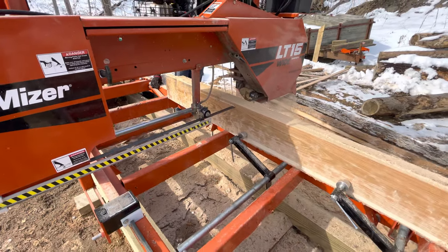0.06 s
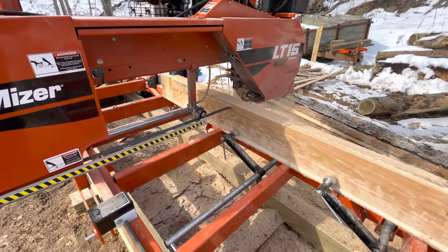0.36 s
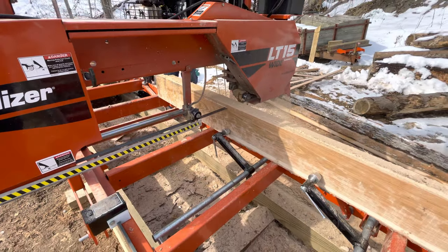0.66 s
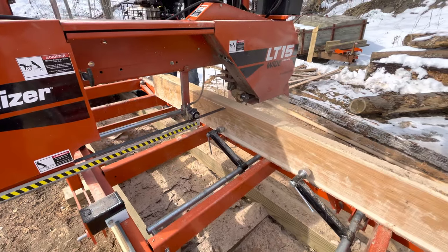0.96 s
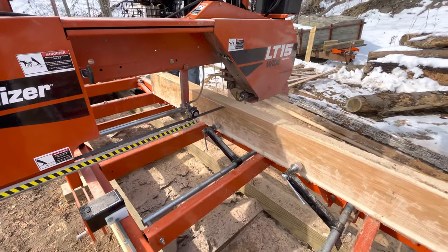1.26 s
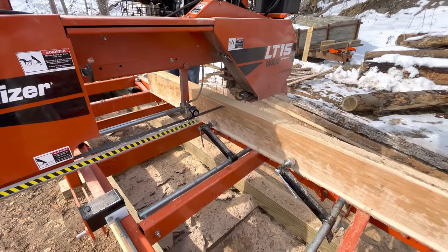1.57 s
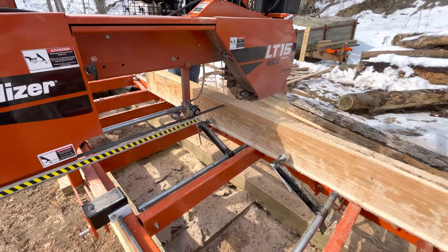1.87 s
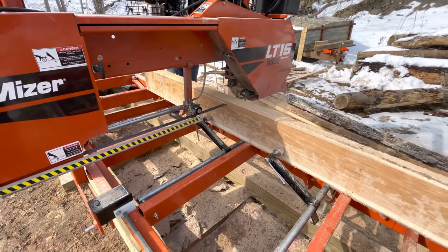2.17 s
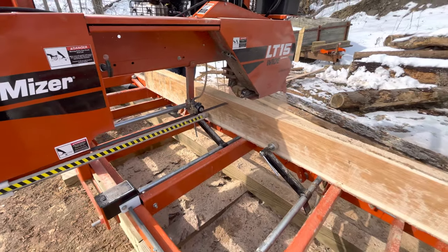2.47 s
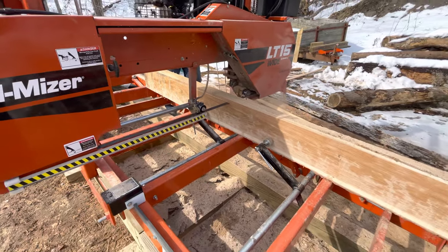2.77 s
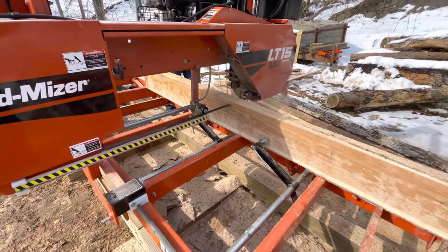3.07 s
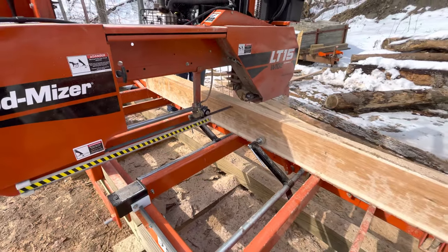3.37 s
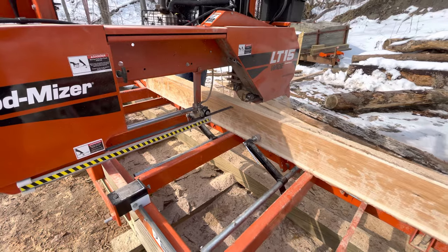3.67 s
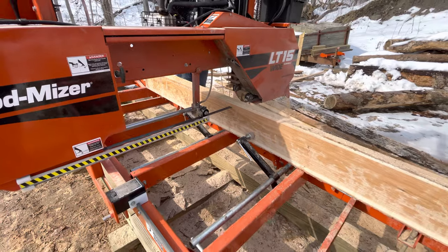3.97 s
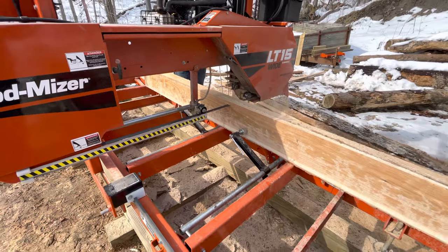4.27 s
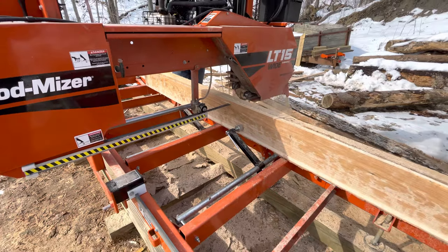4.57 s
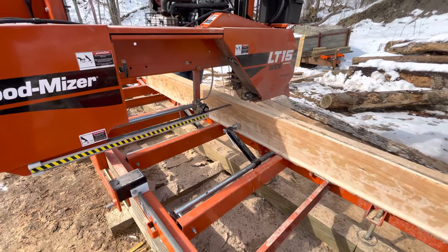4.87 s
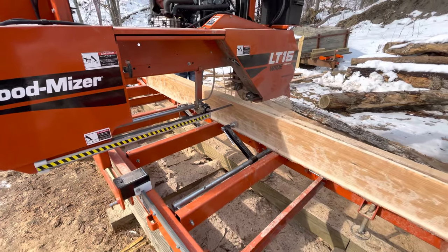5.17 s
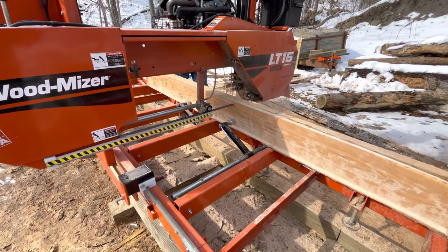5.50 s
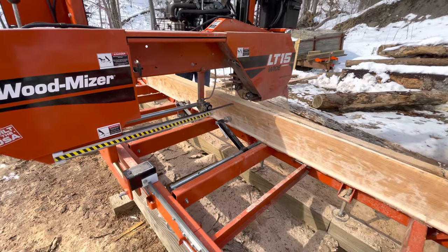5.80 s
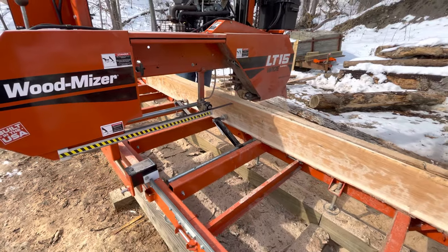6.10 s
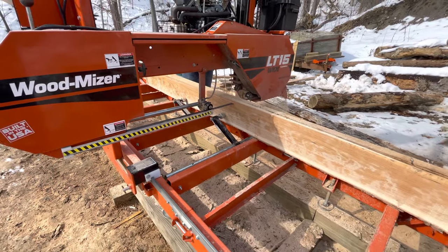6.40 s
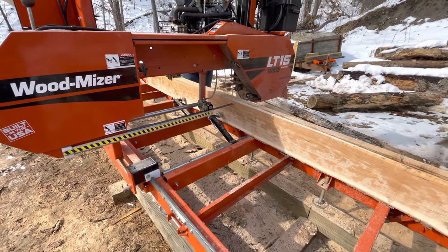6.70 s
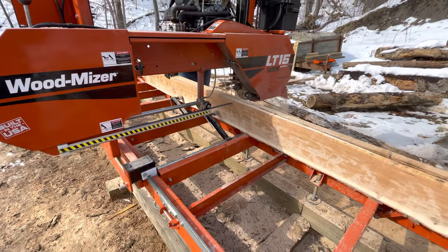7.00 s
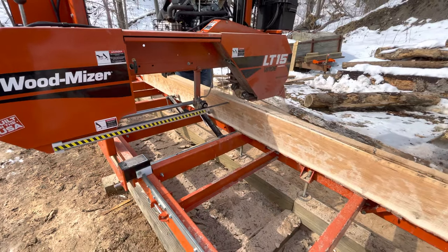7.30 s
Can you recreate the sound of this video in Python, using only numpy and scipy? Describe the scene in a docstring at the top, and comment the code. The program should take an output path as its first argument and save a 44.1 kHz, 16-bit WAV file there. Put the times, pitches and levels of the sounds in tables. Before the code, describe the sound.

A petrol bandsaw mill cuts along a log outdoors, heard from close by. Its engine throbs and clatters throughout, with a rush of fan and wheels, sagging slightly under load. Above it the blade hisses through the wood, with metallic ringing, thin whistles, brief screeches and a singing tone that comes and goes. Midway the microphone backs slowly away, and the sound grows a little softer and less shrill.

```python
"""Outdoors, beside a petrol bandsaw mill that saws along a log; midway the listener backs slowly away.
A twin-cylinder engine throbs with uneven firing and sags a little under load. Its valves and covers
clatter, its fan and the band wheels rush. The blade, belted to the engine, hisses in the cut as fibres
tear; the steel band rings, whistles and catches, and its passing teeth sing a tone that comes and goes."""
import sys
import numpy as np
from scipy import signal
from scipy.fft import rfft, irfft, next_fast_len
from scipy.io import wavfile
from scipy.ndimage import uniform_filter1d

SR = 44100
rng = np.random.default_rng(int(sys.argv[2]) if len(sys.argv) > 2 else 0)


def wav_record(signal):
    """Record a signal, one row per channel, as 16-bit PCM in the file named by sys.argv[1]."""
    frames = np.transpose(np.atleast_2d(signal))
    bounded = np.clip(frames, -1, 1)
    # unit amplitude maps onto the largest positive 16-bit level
    quanta = np.round(bounded * 32767).astype(np.int16)
    wavfile.write(sys.argv[1], SR, quanta)


N = 328545
TIME = np.arange(N) / SR
FREQS = np.fft.rfftfreq(N, 1 / SR)

# Levels in the tables are relative within a layer. An order is a multiple of the engine's cycle rate.
# stereo image: (f/Hz, coherence 0-1, left phase lead/rad, left minus right/dB)
STEREO_IMAGE = [(50, .995, .17, 0), (130, .99, .3, 1), (210, .98, .37, 1.2), (380, .9, .6, 4.2),
                (750, .7, 1.3, 5), (1100, .4, .7, 2), (1500, .35, 1.3, 1), (2100, .5, 1.1, 0),
                (2550, .6, 2.7, -1), (2900, .9, 3.1, 0), (3080, .85, 3.1, 1), (3280, .4, 2.8, 3),
                (3600, .2, 1.8, 2), (4100, .2, -.6, 2.5), (5000, .45, .7, 2.5), (6100, .62, .35, 1.5),
                (7600, .5, 0, 1), (8150, .15, .9, 0), (8900, .55, -.8, 0), (9400, .74, -2.2, -1),
                (9700, .89, -2.95, -1), (10150, .99, -3.14, 0), (10500, .96, -3.3, 0),
                (11000, .84, -4.4, 1), (11800, .85, -6.2, 0), (12400, .8, -6.4, 0), (13500, .7, -9.4, 0),
                (15500, .6, -12.5, 0)]
# load dragging the engine down: (t/s at the slowest, cycle rate drop/Hz, slowing/s, recovery/s)
LOAD_SAGS = [(1.38, .59, .75, 1.15), (4.85, .25, .55, 1.8)]
# hum of rotating parts: (order, level/dB)
WHINE_ORDERS = [(21, -52), (23, -57), (27, -60), (29, -52), (31, -55.5), (39, -61), (40, -54.5), (42, -60),
                (44, -59)]
# spectrum of exhaust gas, fan and band wheels: (f/Hz, level/dB)
RUSH_SPECTRUM = [(20, -88), (55, -82), (140, -75.5), (190, -68), (260, -67), (320, -70.7), (400, -68.5),
                 (460, -67.5), (620, -70.3), (800, -70.3), (960, -72.5), (1250, -69.7), (1950, -75.3),
                 (2400, -73), (3700, -73)]
# the two cylinders: (place/cycles, strength)
FIRINGS = [(.424, 1.0), (.799, .96)]
# muffler chambers: (f/Hz, width/Hz)
MUFFLER_CHAMBERS = [(60, 172), (399, 38)]
# exhaust note: (order, level/dB)
EXHAUST_ORDERS = [(1, -70), (2, -39.5), (3, -51), (4, -58), (5, -40), (6, -39), (7, -38), (8, -36.5),
                  (9, -45.5), (10, -49), (11, -61), (12, -50.5), (13, -44), (14, -49.5), (15, -53),
                  (16, -45.5), (17, -47.7), (18, -57), (19, -53), (20, -54)]
# whistles of the band: (start t/s, end t/s, order, level/dB)
BAND_WHISTLES = [(0, .1, 97.4, -46), (.05, .65, 116.5, -45.7), (.2, .6, 100.5, -52), (.4, .8, 122.8, -50),
                 (.92, 1.6, 126.6, -49), (1.1, 1.65, 115.8, -52), (1.7, 2.25, 122.9, -50),
                 (1.8, 2.4, 114.3, -49), (1.82, 2.05, 119.2, -48), (2.1, 2.85, 124.9, -49),
                 (2.15, 4.0, 109, -53), (2.27, 2.72, 98.3, -48), (3.05, 4.25, 124.3, -48.5),
                 (3.28, 3.65, 124.7, -47), (4.35, 5.2, 108.1, -53), (5.42, 5.62, 116.7, -47),
                 (6.52, 7.5, 108.4, -51), (6.52, 7.5, 123.9, -49)]
# the band rubbing the kerf: (t/s, half length/s, f/Hz, half width/Hz, level/dB)
KERF_CATCHES = [(0.08, .08, 5920, 200, -35), (.3, 0.028, 6050, 500, -36), (.3, .018, 10100, 900, -25),
                (.425, 0.011, 8600, 400, -29), (.43, .025, 10300, 900, -31), (.68, .025, 8700, 400, -32),
                (.71, .02, 10200, 900, -23), (.86, .015, 8850, 400, -27), (1.008, 0.018, 6300, 250, -30),
                (1.025, .025, 10200, 900, -26), (1.455, .016, 10400, 900, -24), (1.5, 0.06, 6200, 300, -37),
                (1.575, .018, 10200, 900, -28), (1.705, .012, 6140, 500, -32),
                (2.26, .025, 10200, 900, -27.5), (2.29, .02, 8600, 400, -26.5),
                (3.11, 0.046, 6000, 300, -34), (3.55, 0.5, 10540, 110, -38), (4.41, 0.028, 6000, 900, -40),
                (6.607, 0.045, 4950, 160, -38), (6.95, 0.15, 4760, 200, -42), (6.99, 0.027, 8400, 400, -32)]
# the blade breaking into song: (start t/s, end t/s, tone level/dB, octave level/dB, left phase lead/rad)
BLADE_SONGS = [(-.1, .12, -45, -46, -.5), (.15, .45, -54, -47, -.5), (0.75, 1.05, -44, -47, .9),
               (1.2, 1.42, -51, -46, 1.2), (1.583, 1.8, -45.5, -45, 1.3), (1.797, 2.1, -42.3, -40.3, .7),
               (2.12, 3.0, -41.6, -55, 1.25), (3.05, 3.4, -42.6, -48.5, 1.5), (3.45, 3.7, -43.5, -50, -2.5),
               (3.9, 4.55, -49.5, -47, -2.2), (4.98, 5.1, -49, -46.5, -2.5),
               (5.224, 5.65, -38.7, -54, -1.55), (5.95, 6.5, -45, -54, -.8), (6.55, 6.8, -47.5, -54, -.8)]
# drone of the tooth set: (t/s, level/dB)
DRONE_LEVELS = [(0, -38.5), (.9, -38), (1.4, -42.5), (2.45, -36), (3.2, -39.5), (3.65, -41), (5.75, -45.5),
                (7.45, -44)]
# harder (+) and softer (-) spots in the wood: (t/s, half length/s, shrill ringing level/dB)
WOOD_SPOTS = [(.55, 0.14, 1.5), (1.422, .15, 1.5), (1.95, 0.085, -1), (2.276, 0.063, 1.5),
              (3.1, 0.068, -1.5), (3.488, 0.13, 3.5), (5.247, 0.44, -1), (6.0, 0.25, 2), (6.43, 0.11, -1)]
# modes of the steel band: (f/Hz, width/Hz, level/dB)
BAND_MODES = [(2297, 200, -12), (2575, 110, -6), (3265, 120, -6.5), (3620, 140, -11), (3984, 120, -9),
              (4370, 110, -8), (4670, 70, -4.5), (4790, 90, -3), (4906, 90, -2.5), (5050, 80, -2),
              (5410, 160, -4), (5820, 140, -5), (6440, 160, -6), (7530, 200, -7.5), (8330, 140, 1),
              (8500, 90, 2), (9380, 110, 4), (9870, 260, 6.5), (10470, 160, 5.5)]
# spectrum of teeth tearing wood and throwing sawdust: (f/Hz, level/dB)
HISS_SPECTRUM = [(3800, -72), (4500, -68.5), (4900, -67), (5600, -66), (5850, -65), (6450, -64.5),
                 (6900, -66.5), (7300, -66), (8000, -65.7), (8200, -58.5), (8600, -59), (9120, -60),
                 (9400, -57.3), (9950, -55.6), (10600, -55.7), (11000, -58.5), (11500, -63.3),
                 (11900, -69.5), (12900, -71.5), (14400, -95), (15700, -83)]

GOVERNED_HZ = 26.47  # four-stroke cycles per second
RETREAT_S = (3.07, 5.84)  # the listener backs away between these times
SONG_ATTACK_S, SONG_RELEASE_S = .06, .1


def gain_of(db):
    """Decibels to amplitude."""
    return 10 ** (np.asarray(db) / 20)


def unit_rms(x):
    """Scales to rms 1."""
    return x / np.sqrt(np.mean(abs(x) ** 2) + 1e-20)


def over_freqs(rows):
    """Each column of a frequency table, spread over FREQS on a log axis."""
    hz, *columns = np.transpose(rows)
    return [np.interp(np.log(FREQS + 1), np.log(hz + 1), column) for column in columns]


def drift(rate_hz):
    """Smooth random wander of rms 1, no faster than about rate_hz."""
    size = next_fast_len(N)
    lowpass = np.exp(-(np.fft.rfftfreq(size, 1 / SR) / rate_hz) ** 2)
    return unit_rms(irfft(rfft(rng.standard_normal(size)) * lowpass, size)[:N])


def pulse(cycles, place, width):
    """A smooth bump once an engine cycle; place and width are in cycles."""
    return np.exp(-(((cycles - place + .5) % 1 - .5) / width) ** 2)


def swell(start, end, attack, release):
    """An envelope that reaches 1 at start, holds until end and falls away; times in seconds."""
    return np.exp(-(np.maximum(start - TIME, 0) / attack) ** 2 - (np.maximum(TIME - end, 0) / release) ** 2)


def retreat(near_db, far_db):
    """A fader move from the near level to the far one as the listener backs away."""
    return np.interp(TIME, RETREAT_S, [near_db, far_db])


def in_stereo(pair, colour=1):
    """Filters two signals by colour and blends them into the stereo image, at rms 1."""
    coherence, lead, side_db = over_freqs(STEREO_IMAGE)
    left, other = rfft(pair) * colour
    right = (coherence * left + np.sqrt(1 - coherence ** 2) * other) * np.exp(-1j * lead)
    return unit_rms(irfft(np.array([left * gain_of(side_db / 2), right * gain_of(-side_db / 2)]), N))


def shimmer(x, depth_db, bins, frames):
    """Lets patches of the spectrum, bins wide and frames long, swell and fade on their own; rms 1."""
    spectra = signal.stft(x, nperseg=2048, noverlap=1536)[2]
    patches = uniform_filter1d(rng.standard_normal(spectra.shape[1:]), bins, 0)
    patches = unit_rms(uniform_filter1d(patches, frames, 1))
    spectra *= gain_of(depth_db * patches)
    return unit_rms(signal.istft(spectra, nperseg=2048, noverlap=1536)[1][:, :N])


def engine_speed():
    """Cycle rate in Hz: the governor holds it, each load drags it down and lets it recover."""
    return GOVERNED_HZ - sum(hz * swell(t, t, slowing, recovery) for t, hz, slowing, recovery in LOAD_SAGS)


def tappet(cycles, level_db=-47, centre_hz=6240, half_width_hz=2300):
    """One loose valve ticks brightly, once in every engine cycle."""
    tick = pulse(cycles, place=.607, width=.033) * (1 + .25 * drift(14))
    colour = np.exp(-((FREQS - centre_hz) / half_width_hz) ** 4)
    return gain_of(level_db) * in_stereo(rng.standard_normal((2, N)) * tick, colour)


def whine(cycles):
    """Rotating parts hum on a few high orders, each wavering a little in level."""
    hum = sum(gain_of(db) * np.cos(2 * np.pi * (order * cycles + rng.random())) * (1 + .16 * drift(3.7))
              for order, db in WHINE_ORDERS)
    return np.std(hum) * in_stereo([hum, np.zeros(N)])


def clatter(cycles, level_db=-41.5, low_cut_hz=520, tilt_hz=1100, points=1024):
    """Valves and covers rattle the same way in every cycle: a dense comb of lines above the exhaust."""
    places = np.arange(points) / points
    patterns = rng.standard_normal((2, points))
    rattle = np.array([np.interp(cycles % 1, places, pattern, period=1) for pattern in patterns])
    highpass = 1 - 1 / (1 + (FREQS / low_cut_hz) ** 8)
    colour = highpass / (1 + (FREQS / tilt_hz) ** 2) ** .05
    return gain_of(level_db) * in_stereo(rattle * (1 + .53 * drift(52)), colour)


def rush(cycles, level_db=-36.5, crossover_hz=520, top_hz=4000, puff_delay=.04):
    """Gas puffs out just after each firing; above that the fan and wheels rush, throbbing lightly."""
    firing = sum(strength * pulse(cycles - puff_delay, place, width=.02) for place, strength in FIRINGS)
    throb = sum(pulse(cycles, place, width=.1) for place in (.35, .72))
    puffs = unit_rms(rng.standard_normal((2, N)) * (1 + .11 * firing))
    fan = unit_rms(rng.standard_normal((2, N)) * (1 + .11 * throb))
    low_share = 1 / (1 + (FREQS / crossover_hz) ** 6)
    air = irfft(rfft(puffs) * np.sqrt(low_share) + rfft(fan) * np.sqrt(1 - low_share), N)
    colour = gain_of(over_freqs(RUSH_SPECTRUM)[0]) / (1 + (FREQS / top_hz) ** 12)
    return gain_of(level_db) * shimmer(in_stereo(air, colour), depth_db=3, bins=2, frames=40)


def exhaust(cycles, unsteadiness=.03):
    """Two unevenly spaced firings a cycle ring the muffler; no two burn quite alike."""
    mean_hz = cycles[-1] / TIME[-1]
    burn = drift(11)
    note = np.zeros(N)
    for order, db in EXHAUST_ORDERS:
        firings = sum(strength * np.exp(-2j * np.pi * order * place) for place, strength in FIRINGS)
        # the chambers draw out each pulse
        lag = sum(2 * np.arctan(2 * (order * mean_hz - hz) / width) for hz, width in MUFFLER_CHAMBERS)
        force = 1 + unsteadiness * np.log(order / 2) * (burn + drift(29))  # order 2 stays steady
        note -= gain_of(db) * force * np.cos(2 * np.pi * order * cycles + np.angle(firings) - lag)
    return np.std(note) * in_stereo([note, np.zeros(N)])


def whistles(cycles, level_db=-.5, roughness=.65):
    """Thin, grainy whistles of the band come and go; their pitch sags and recovers with the engine."""
    grit = np.array([drift(15) + 1j * drift(15) for _ in range(2)])
    tones = sum(gain_of(db) * swell(start, end, SONG_ATTACK_S, SONG_RELEASE_S)
                * np.exp(2j * np.pi * order * cycles) for start, end, order, db in BAND_WHISTLES)
    grainy = ((np.array([[1], [0]]) + roughness * grit) * tones).real
    return gain_of(level_db) * np.std(tones) * in_stereo(grainy)


def catches():
    """The band rubs the kerf and one resonance flares: a narrow one screeches, a broad one spits."""
    flares = np.zeros((2, N))
    for peak_s, half_s, hz, half_width_hz, db in KERF_CATCHES:
        span = abs(TIME - peak_s) < 3 * half_s
        t = TIME[span] - peak_s
        colour = np.exp(-((np.fft.rfftfreq(len(t), 1 / SR) - hz) / half_width_hz) ** 2)
        noise = rng.standard_normal((2, N))[:, span]
        rub = unit_rms(irfft(rfft(noise) * colour, len(t)))
        flares[:, span] += gain_of(db) * np.exp(-(t / half_s) ** 2) * rub
    return np.std(flares) * in_stereo(flares)


def song_envelopes(idle_tone_db=-50, idle_lead_rad=-2.15):
    """Tooth tone and octave levels in dB, set by the strongest song, and the tone's left phase lead."""
    start, end, tone_db, octave_db, lead = np.transpose(BLADE_SONGS)[:, :, None]
    shapes = swell(start, end, SONG_ATTACK_S, SONG_RELEASE_S)
    tone = np.maximum((shapes * gain_of(tone_db)).max(0), gain_of(idle_tone_db))
    octave = np.maximum((shapes * gain_of(octave_db)).max(0), gain_of(retreat(-87, -76.5)))
    singing = shapes.max(0)
    song_lead = (shapes * lead).sum(0) / (shapes.sum(0) + 1e-12)
    return 20 * np.log10(tone), 20 * np.log10(octave), singing * song_lead + (1 - singing) * idle_lead_rad


def blade_tone(periods, level_db, lead_rad, roughness):
    """A tone locked to the blade and roughened by uneven teeth."""
    pure = np.exp(.5j * lead_rad * np.array([[1], [-1]]))
    grit = np.array([drift(67) + 1j * drift(76) for _ in range(2)])
    return gain_of(level_db) * unit_rms(((pure + roughness * grit) * np.exp(2j * np.pi * periods)).real)


def teeth(cycles, teeth_per_cycle=41.1):
    """Teeth strike the log in step with the engine; their left-right-straight set drones at 1/3 the rate."""
    strikes = teeth_per_cycle * cycles
    tone_db, octave_db, lead_rad = song_envelopes()
    # the louder the blade sings, the purer its tone
    tone_roughness = .32 * gain_of(-.5 * (tone_db - tone_db.mean()))
    octave_roughness = .42 * gain_of(-.6 * (octave_db - octave_db.mean()))
    tone = blade_tone(strikes, tone_db + .8, lead_rad, tone_roughness)
    octave = blade_tone(2 * strikes, octave_db + 1.8, lead_rad=.5, roughness=octave_roughness)
    drone_db = np.interp(TIME, *np.transpose(DRONE_LEVELS)) - 4
    drone = blade_tone(strikes / 3, drone_db, lead_rad=.87, roughness=.22)
    return tone + octave + drone * gain_of([[2.2], [-2.2]])  # the drone sits to the left


def bite(hold_s=.98, fade_db_per_s=.96):
    """Gains in dB for the cut: hard wood lifts its body slightly and its shrill ringing fully."""
    hardness_db = sum(db * swell(t, t, half_s, half_s) for t, half_s, db in WOOD_SPOTS)
    fade_db = fade_db_per_s * np.maximum(TIME - hold_s, 0)  # the shrillness dies down along the cut
    return retreat(.87, -.44) + .11 * hardness_db, 2.33 - fade_db + hardness_db


def cut(hiss_db=-25, low_cut_hz=3700, shrill_hz=8650, shrill_half_width_hz=650):
    """Tearing fibres hiss unevenly and set the steel band ringing."""
    tearing = (1 + .042 * drift(25)) * (1 + .087 * drift(790))
    highpass = 1 - 1 / (1 + (FREQS / low_cut_hz) ** 12)
    colour = gain_of(over_freqs(HISS_SPECTRUM)[0]) * highpass
    hiss = in_stereo(rng.standard_normal((2, N)) * tearing, colour)
    hiss = shimmer(hiss, depth_db=3.5, bins=2, frames=24)
    hiss = shimmer(hiss, depth_db=.7, bins=30, frames=3)
    mode_power = sum(gain_of(db) ** 2 / (1 + (2 * (FREQS - hz) / width) ** 2) ** 2
                     for hz, width, db in BAND_MODES)
    ring = in_stereo(rng.standard_normal((2, N)) * tearing, np.sqrt(mode_power))
    ring = shimmer(ring, depth_db=4, bins=2, frames=26)
    sawing = gain_of(hiss_db) * hiss + gain_of(retreat(-30.5, -31.5)) * ring
    shrill = irfft(rfft(sawing) / (1 + ((FREQS - shrill_hz) / shrill_half_width_hz) ** 4), N)
    body_db, shrill_db = bite()
    return gain_of(body_db) * (sawing - shrill) + gain_of(shrill_db) * shrill


def scene():
    """The engine as the bed, the blade on top; one crankshaft sets the pitch of both."""
    cycle_hz = engine_speed()
    cycles = np.cumsum(cycle_hz) / SR
    machinery = rush(cycles) + clatter(cycles) + whine(cycles) + tappet(cycles)
    exhaust_db = retreat(.5, -2.15) + 3 * (cycle_hz - GOVERNED_HZ)  # softer as the engine slows
    engine = gain_of(retreat(1, -.9)) * machinery + gain_of(exhaust_db) * exhaust(cycles)
    return engine + cut() + teeth(cycles) + whistles(cycles) + catches()


def record(dry):
    """A steep high cut at 15.8 kHz takes the very top off the mix."""
    lowpass = signal.firwin(511, 15800, window=("kaiser", 9), fs=SR)
    return signal.oaconvolve(dry, lowpass[None], "same")


dry = scene()
out = record(dry)
wav_record(out)
```